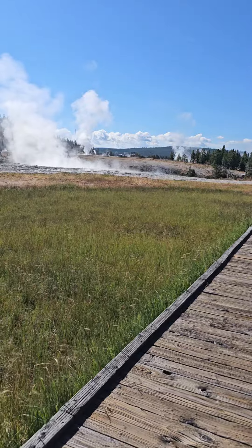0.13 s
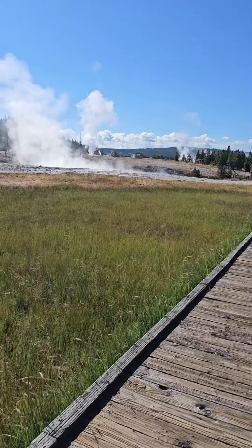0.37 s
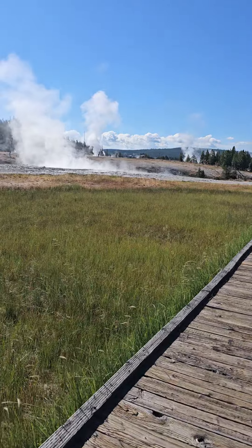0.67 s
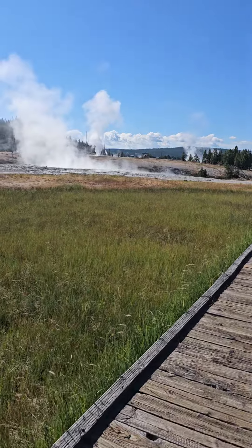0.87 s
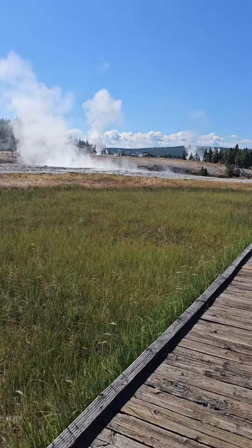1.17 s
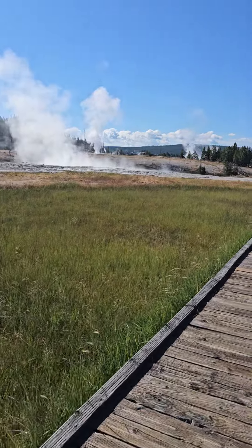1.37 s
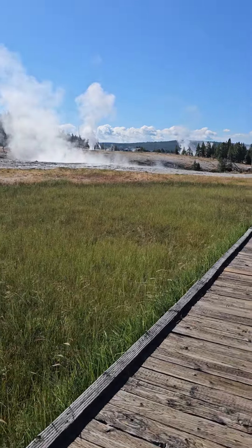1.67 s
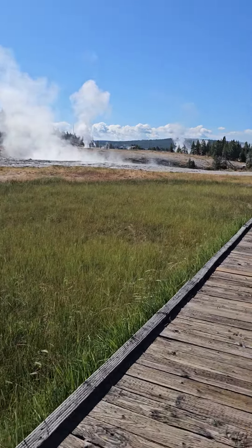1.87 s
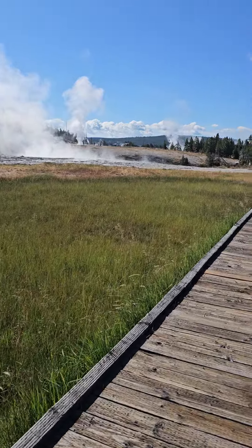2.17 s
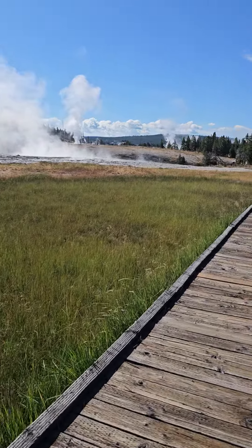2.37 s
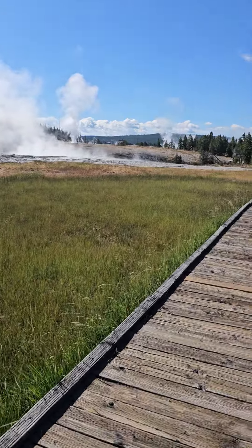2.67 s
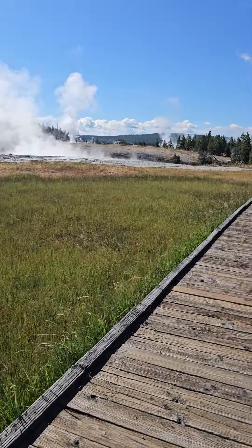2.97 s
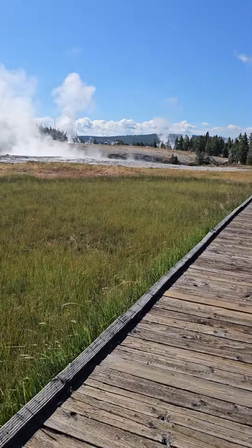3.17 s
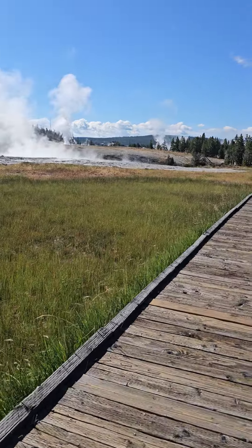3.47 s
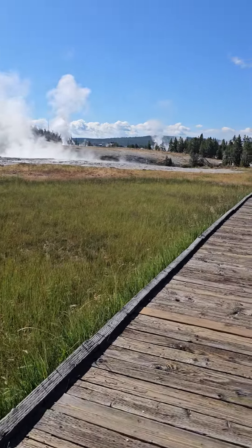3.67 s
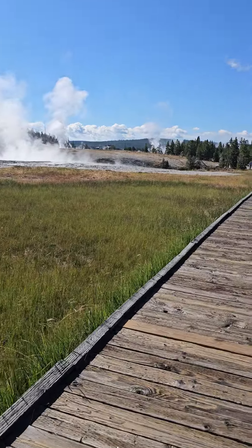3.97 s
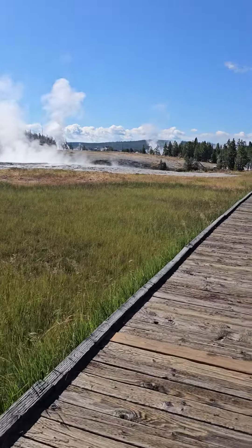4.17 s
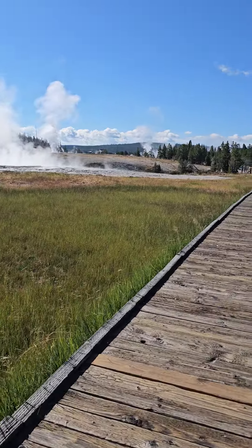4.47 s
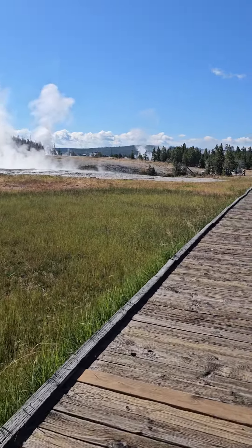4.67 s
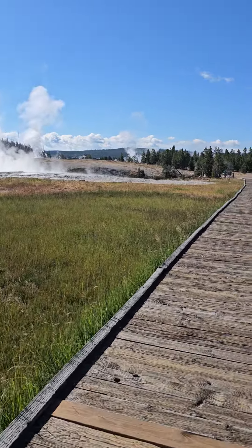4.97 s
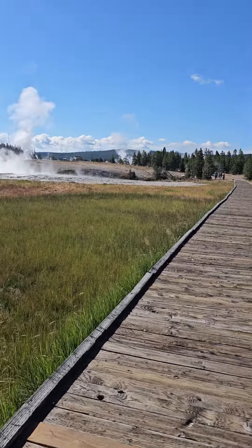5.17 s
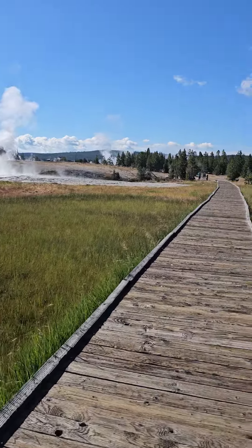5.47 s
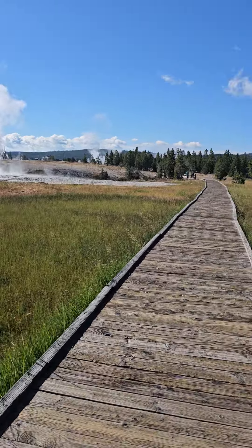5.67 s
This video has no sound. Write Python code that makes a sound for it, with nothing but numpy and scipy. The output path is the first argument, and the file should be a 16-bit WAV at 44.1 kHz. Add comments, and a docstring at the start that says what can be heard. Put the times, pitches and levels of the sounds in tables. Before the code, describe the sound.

An open outdoor place with light wind: a soft, lumpy low rumble swelling in small gusts, notably around 1.2, 3 and 5.3 seconds, plus a faint airy hiss. From the start, quick footsteps tap a wooden boardwalk about every 0.27 seconds, quiet and dull, with small bounces between. At about 2.8 seconds they become much louder and closer, each a short hollow plank knock around a low-mid pitch, with a noisy sole crack and brief deck rumble. A faint metal clink comes near 2.9. Steps continue evenly to the end; those near 4.9, 5.15 and 5.45 crack more sharply. Hard clicks stand out at 4.75, 5.35, 5.43, 5.6 and 5.8, with a small ringing clink at 4.75 and a shorter one at 5.6. Gritty scuffs brush between late steps. Hand-held stereo microphone, dry, brighter on the right.

```python
"""Quick steps grow louder as they come closer along a wooden boardwalk, over light wind and faint outdoor hiss.
Each step knocks a plank: damped modes of the wood, a noisy sole crack and the rumble of the deck.
Soles scuff as shaped noise, small hard things click as short noise bursts, and a bit of metal clinks
now and then as dying modes. Wind and hiss are noise with drifting spectra.
A hand-held pair of microphones hears it all; the body shades the left port's treble from the walkway."""
import sys
import numpy as np
from scipy import signal
from scipy.fft import rfft, irfft, next_fast_len
from scipy.io import wavfile
from scipy.ndimage import uniform_filter1d

SR = 44100
rng = np.random.default_rng(int(sys.argv[2]) if len(sys.argv) > 2 else 0)


def generate_wav(sig):
    """Save sig (samples, or channels by samples) to the path in sys.argv[1] as 16-bit PCM at SR."""
    pcm = np.round(np.clip(np.atleast_2d(sig).T, -1, 1) * 32767).astype(np.int16)
    wavfile.write(sys.argv[1], SR, pcm)


N = 256653

# Spectrum of the outdoor hiss, which also colours the scuffs: hz, level_db (relative, per Hz)
AIR_SPECTRUM = [(88, -37.5), (150, -13.5), (264, -13), (348, -31), (662, -30.5), (960, -24.5),
                (1400, -28.5), (1850, -27.5), (2200, -22.5), (2600, -32.5), (3160, -31), (4240, -28),
                (5790, -30.5), (7470, -30.5), (10400, -36.5), (14800, -33.5), (16000, -56)]


def amp(db):
    """Level law: decibels to amplitude gain."""
    return np.exp(np.asarray(db) * (np.log(10) / 20))


def read(points, hz):
    """Logarithmic frequency scale: interpolates a spectrum table along it."""
    table_hz, value = np.transpose(points)
    return np.interp(np.log(hz + 1), np.log(table_hz + 1), value)


def octaves(hz, reference_hz):
    """Pitch interval: octaves of a frequency above a reference, safe at 0 Hz."""
    return np.log2((hz + 1) / reference_hz)


def octaves_below(hz, corner_hz):
    """High-pass slope: octaves by which a frequency lies below a corner, else 0."""
    return np.maximum(np.log2(corner_hz / (hz + 1)), 0)


def peaked(x):
    """Peak normalisation: scales the largest excursion to 1."""
    return x / (np.abs(x).max() + 1e-12)


def ring(hz, db, t60, t, phase=0):
    """Modal superposition: a sum of sines, each falling 60 dB in its t60."""
    hz, db, t60, phase = (np.reshape(v, (-1, 1)) for v in (hz, db, t60, phase))
    envelope = amp(db - 60 * t / t60)
    partials = envelope * np.sin(2 * np.pi * hz * t + phase)
    return (partials * (hz < SR / 2)).sum(0)


def colour(x, db_at):
    """Linear filtering: multiplies the spectrum by a gain in dB given as a function of frequency."""
    size = next_fast_len(len(x))
    gain = amp(db_at(np.fft.rfftfreq(size, 1 / SR)))
    return irfft(rfft(x, size) * gain, size)[:len(x)]


def add(mix, s, sound, pan_db=0):
    """Interaural-style cues: a time lag at the left port and a left-minus-right level difference."""
    lag_s = .00046  # the left port hears the walkway later
    for channel, (delay, db) in enumerate([(lag_s / 2, pan_db / 2), (-lag_s / 2, -pan_db / 2)]):
        start = max(round((s + delay) * SR), 0)
        part = mix[channel, start:][:len(sound)]
        part += amp(db) * sound[:len(part)]


def hiss(points, patchy_db, swell_db, size):
    """Partly coherent random noise at two ports, with drifting patches and a shared flicker, rms 1."""
    # Left-right likeness of the noise: hz, coherence (0 to 1)
    likeness = [(20, 0.61), (150, 0.98), (600, 0.14), (2000, 0.043), (16000, 0.18)]
    frames, hz = 4 * N // size + 6, np.fft.rfftfreq(size, 1 / SR)
    a, b, c, d, patch = rng.standard_normal((frames, len(hz), 5)).T
    patch = uniform_filter1d(uniform_filter1d(patch, size=12, axis=0), size=10, axis=1)
    swell = uniform_filter1d(rng.standard_normal(frames), size=8)
    same = np.clip(read(likeness, hz), -1, 1)[:, None]
    left = a + 1j * b
    right = same * left + np.sqrt(1 - same ** 2) * (c + 1j * d)
    level_db = read(points, hz)[:, None] + patchy_db * patch / patch.std() + swell_db * swell / swell.std()
    spectra = np.array([left, right]) * amp(level_db)
    out = signal.istft(spectra, nperseg=size, noverlap=3 * size // 4)[1][:, :N]
    return out / out.std()


def wind():
    """Turbulence noise: a lumpy low rumble whose level follows the gusts."""
    # Gusts: time_s, rms_db
    gusts = [(0.0, -41), (0.13, -47), (0.26, -43.5), (0.68, -48.5), (1.0, -48), (1.2, -37.5), (1.45, -40.5),
             (2.28, -47.5), (2.5, -43.5), (2.77, -45), (2.95, -37.5), (3.13, -50), (3.5, -40.5),
             (4.05, -42.5), (4.4, -45.5), (4.9, -48.5), (5.33, -33.5), (5.55, -45), (5.82, -37.5)]
    # Rumble spectrum: hz, level_db (relative, per Hz)
    rumble_spectrum = [(15, -11), (35, 7.5), (70, -2), (140, -12.5), (300, -22), (700, -25.5), (1500, -100)]
    s, db = np.transpose(gusts)
    rumble = hiss(rumble_spectrum, patchy_db=4.0, swell_db=0.5, size=2048)
    return amp(np.interp(np.arange(N) / SR, s, db)) * rumble


def air():
    """Broadband background noise split into two bands: a steady low part and a treble that rises and falls."""
    # Treble of the hiss: time_s, rms_db
    treble_levels = [(0.0, -63.5), (0.08, -63.5), (0.81, -69), (1.22, -55.5), (1.34, -61), (1.72, -63.5),
                     (2.12, -69), (2.59, -65), (3.1, -69.5), (3.66, -64.5), (3.81, -60.5), (3.97, -61.5),
                     (4.25, -70), (4.67, -63.5), (4.8, -74), (5.17, -64.5), (5.4, -58.5), (5.82, -69)]
    treble_hz, low_gain_db = 3500, -57
    s, db = np.transpose(treble_levels)
    both = hiss(AIR_SPECTRUM, patchy_db=1.8, swell_db=.7, size=1024)
    high = np.array([colour(x, lambda f: -30 * octaves_below(f, treble_hz)) for x in both])
    treble_gain = amp(np.interp(np.arange(N) / SR, s, db))
    return amp(low_gain_db) * (both - high) + treble_gain * high / high.std()


def deck(t):
    """Dense modal field of joists and farther planks: each random partial dies at the speed of its region."""
    # Deck spectrum: hz, level_db (relative, per Hz)
    deck_spectrum = [(25, -41), (60, 3), (110, 1), (220, -6), (400, -16), (800, -9), (1600, -20.5),
                     (4000, -47)]
    # Deck decay: hz, t60_s
    deck_decay = [(50, 0.12), (200, 0.29), (600, 0.093), (2000, 0.02)]
    hz = np.exp(rng.uniform(np.log(30), np.log(3000), size=70))
    # partials spread evenly per octave thin out per Hz as 1/f, so each gains 10 log f
    level_db = read(deck_spectrum, hz) + 10 * np.log10(hz)
    return peaked(ring(hz, level_db, read(deck_decay, hz), t, rng.uniform(0, 2 * np.pi, len(hz))))


def steps():
    """Impact excitation of plank modes: the foot loads the wood gradually, the sole cracks, the deck rumbles on."""
    # Heel blows, with toe landings and bounces between:
    # time_s, knock_db, plank_pitch_hz, crack_db (over the knock), damping (factor on the low modes)
    step_table = [(0.065, -35, 96, -1.5, 0.79), (0.359, -37, 226, -40, 0.53),
                  (0.508, -26.5, 209, -10.5, 0.93), (0.522, -20, 211, -8.5, 1.9),
                  (0.595, -28, 228, -7.5, 0.48), (0.62, -36.5, 306, -10, 1.3), (0.887, -25, 273, -10, 0.79),
                  (1.14, -38.5, 155, 4, 1.5), (1.188, -28, 165.5, -5, 2.2), (1.422, -28.5, 192, -21, 0.74),
                  (1.707, -24, 223, -15, 1.36), (1.888, -33, 123.4, -2, 1), (1.955, -23.5, 277, -13, 0.34),
                  (2.007, -28.5, 220.5, -2.5, 0.8), (2.247, -27.5, 278.4, -13, 0.65),
                  (2.504, -23.5, 142, -16, 1.75), (2.558, -31.5, 200, -28, 0.97),
                  (2.637, -26, 106.6, -16, 1.5), (2.678, -39.5, 137, -9, 2.5),
                  (2.722, -33, 107, -4.5, 0.78), (2.793, -13, 199, -11.5, 1.4),
                  (2.849, -31, 220, -33, 0.92), (3.029, -29, 237, -6, 1.1),
                  (3.045, -8.5, 215.3, -15.5, 1.65), (3.279, -19.5, 202.5, -10, 0.62),
                  (3.348, -25, 108, -12, 1.6), (3.434, -25, 106, -36, 0.53), (3.544, -24, 329, -17, 0.76),
                  (3.551, -12.5, 198.5, -41, 0.66), (3.827, -13.5, 222.3, -13.5, 0.86),
                  (4.09, -14.5, 173.4, -14, 0.58), (4.355, -13, 150.5, -13, 0.52),
                  (4.614, -21, 190, -4.5, 0.22), (4.632, -18.5, 154.6, -28, 0.48),
                  (4.729, -27, 138, -15, 1.46), (4.891, -13.5, 266.4, 4, 0.55),
                  (4.922, -21.5, 94.2, -35, 0.55), (5.155, -9.5, 273.7, 0.5, 0.98),
                  (5.44, -11, 237.7, -9.5, 0.34), (5.453, -11, 266.7, 12, 0.54),
                  (5.474, -15.5, 181, -43, 2.6), (5.726, -18.5, 219.4, -25, 1.4),
                  (5.733, -13, 264, -10, 0.59)]
    # Plank modes: factor (on the plank's pitch), level_db, t60_s
    plank_modes = [(0.553, -14.5, 0.14), (0.752, -5.5, 0.06), (1.013, 0, 0.057), (1.299, -4.5, 0.033),
                   (1.7, -5.5, 0.031), (2.102, -10, 0.034), (2.602, -15, 0.04), (3.3, -23.5, 0.084),
                   (4.3, -13, 0.015)]
    # Sole crack spectrum: hz, level_db (relative, per Hz)
    crack_spectrum = [(300, -44), (550, 5), (800, 4.5), (1100, 14), (1350, 5.5), (1650, -0.5),
                      (2200, -10.5), (2900, -7), (4300, -10), (6500, -21), (10000, -32.5), (16000, -46)]
    rise_s, deck_db = .004, -5  # time constant of the load; deck rumble relative to the plank modes
    sole_tilt_db = -0.03  # sole hardness, per octave
    grit_db = 2  # the sole meets the grain unevenly, so the crack stutters
    out, t = np.zeros((2, N)), np.arange(SR // 4) / SR
    factor, mode_db, t60 = np.transpose(plank_modes)
    load = (1 - np.exp(-t / rise_s)) ** 2
    fade = amp(-60 * t / 0.066) + 0.57 * amp(-60 * t / 0.025) + 0.02 * amp(-60 * t / 0.12)
    for s, db, hz, crack_db, damping in step_table:
        spread = rng.standard_normal((2, len(factor)))
        grit, bumps = rng.standard_normal((2, len(t)))
        held = np.where(factor < 1.5, damping, 1)  # the foot's weight damps the low modes
        mode_hz = hz * factor * (1 + 0.058 * spread[0])
        modes = ring(mode_hz, mode_db, t60 / held, t, 0.74 * spread[1])
        knock = peaked(load * modes) + amp(deck_db) * np.tanh(t / 0.0079) * deck(t)
        crack = colour(grit, lambda f: read(crack_spectrum, f) + sole_tilt_db * np.log2((f + 100) / 1200))
        stutter = amp(grit_db * uniform_filter1d(bumps, size=100) * 10)  # 10 restores rms 1 after smoothing
        crack = peaked(crack * fade * stutter * np.tanh(t / 0.0011))
        start_s = s - .003
        add(out, start_s, amp(db) * knock, pan_db=2.2)
        add(out, start_s + 0.62 * rise_s, amp(db + crack_db) * crack, pan_db=1)
    return out


def scuffs():
    """Friction noise: soles drag over the wood as grainy noise that swells and fades."""
    # Drags: middle_s, half_length_s, rms_db (before the swell)
    scuff_table = [(0.524, 0.089, -82), (2.169, 0.11, -57), (4.23, 0.021, -58), (4.751, 0.032, -46.5),
                   (4.934, 0.04, -47.5), (5.307, 0.073, -53), (5.394, 0.048, -50.5), (5.436, 0.044, -55),
                   (5.556, 0.047, -53), (5.741, 0.042, -47)]
    tilt_db, grain_db = -4, 2.7  # per octave; rms of the level's roughness
    out = np.zeros((2, N))
    for s, half_length, db in scuff_table:
        grit, bumps = rng.standard_normal((2, SR // 4))[:, :round(half_length * 2 * SR)]
        grain = amp(grain_db * uniform_filter1d(bumps, size=30) * np.sqrt(30))
        rub = colour(grit * grain, lambda f: (
            read(AIR_SPECTRUM, f) + tilt_db * octaves(f, 3000) - 40 * octaves_below(f, 900)))
        swell = np.hanning(len(rub))
        add(out, s - half_length, amp(db) * rub / rub.std() * swell, pan_db=-1.5)
    return out


def clicks():
    """Impulsive contact: short hard ticks, a noise burst around one pitch with a brighter top."""
    # Ticks: start_s, body_peak_db, main_pitch_hz, top_db (over the body)
    click_table = [(0.51, -40, 5000, -4), (0.588, -40, 3120, -18), (0.825, -64, 2060, 15.5),
                   (1.5343, -34, 3100, -14), (1.8941, -33.5, 1850, 5), (2.0103, -37.5, 1960, -33),
                   (2.9185, -36.5, 3700, -23), (3.2824, -59, 4230, -19), (3.3518, -50.5, 1900, 13.5),
                   (3.5456, -40, 1900, -8), (3.7252, -49, 3580, -1), (3.9436, -38.5, 1760, -2),
                   (4.149, -38, 2840, -8), (4.164, -44, 4110, -2), (4.2193, -38.5, 2270, -30),
                   (4.2943, -33, 2930, -42), (4.3833, -39.5, 2160, -5), (4.5038, -41.5, 2140, -26),
                   (4.7503, -14, 3760, -13), (5.001, -36.5, 2360, -28), (5.2952, -37.5, 3180, -4),
                   (5.348, -8.5, 4200, -41), (5.3708, -42, 2470, -2), (5.394, -38, 2510, -16),
                   (5.4272, -16.5, 3100, -9), (5.5513, -37.5, 2520, -21), (5.6021, -39, 2175, 2.5),
                   (5.6178, -21, 2580, -29), (5.7257, -28.5, 2330, -3.5), (5.7494, -33, 4170, -37),
                   (5.8134, -15.5, 4000, -32)]
    out, t = np.zeros((2, N)), np.arange(SR // 10) / SR
    decay = amp(-60 * t / 0.0013) + 0.16 * amp(-60 * t / 0.037) + 0.0088 * amp(-60 * t / 0.2)
    shape = np.tanh(t / 0.00014) * decay
    # a patter of five faint ticks at random moments from 4.55 to 4.74 s
    faint = [(np.interp(when, (0, 1), (4.55, 4.74)), -47.5 + 4 * size, 1900 + 900 * pitch, -0.5)
             for when, size, pitch in rng.random((5, 3))]
    for s, db, hz, top_db in list(click_table) + faint:
        a, b = rng.standard_normal((2, len(t)))
        body = colour(a, lambda f: -18 * np.maximum(abs(octaves(f, hz)) - .3, 0))
        top = colour(b, lambda f: -14 * abs(octaves(f, 7500)))
        tick = peaked(body * shape) + amp(top_db) * peaked(top * shape)
        add(out, s, amp(db) * tick, pan_db=-4.5)
    return out


def clinks():
    """Beating mode pairs: small metal parts ring until the next touch damps them; close twins make them waver."""
    # Clinks: start_s, gain_db, best_woken_hz, fall_off_db (per octave away from it), damped_after_s
    clink_table = [(2.919, -56.5, 4900, 5, 0.1), (2.925, -42, 2640, 55, 0.16),
                   (3.284, -61, 3600, 2.5, 0.13), (3.73, -52, 2480, 4.5, 0.075),
                   (4.217, -58.5, 2070, 8, 0.028), (4.722, -56, 1740, 31, 0.01),
                   (4.751, -36.5, 3640, 6.5, 0.256), (4.777, -43, 5250, 27, 0.11),
                   (4.895, -45, 4800, 24, 0.34), (5.03, -58, 1800, 25, 0.1), (5.621, -25, 2870, 210, .09)]
    # Metal mode strengths, in the order of metal_hz: level_db, t60_s
    metal_modes = [(2, 0.36), (12, 0.041), (-14.5, 0.75), (-24, 0.81), (-9, 0.88), (-8, 0.45), (9, 0.099),
                   (-5, 0.19), (14, 0.019), (-9, 1), (-29, 0.2), (-1.5, 0.33), (-21.5, 0.18), (-5, 0.14),
                   (-12, 0.83), (-51, .25), (11.5, 0.11), (-8, .08), (-1.5, 0.33), (2, 0.29), (-20, 0.26),
                   (-2, 0.29), (-6.5, 0.31), (10, 0.1), (5, 0.092), (0, 0.18), (-8, 0.07), (-18, 0.055),
                   (12, 0.096), (-16, 0.045)]
    # Metal mode pitches: pitch_hz
    metal_hz = [1739, 2250, 2530, 2880, 3133, 3456, 3628, 4118, 4426, 4755, 4910, 5255, 6125, 6422, 6643,
                6750, 7405, 7779, 8120, 8610, 9600, 10022, 10480, 11450, 11632, 12250, 12990, 13730, 14550,
                15250]
    splash_db, splash_t60_s = 5.5, 0.051  # countless short modes splash at each clink
    out, t, hz = np.zeros((2, N)), np.arange(SR // 3) / SR, np.array(metal_hz)
    mode_db, t60 = np.transpose(metal_modes)
    for s, db, woken_hz, fall_db, length in clink_table:
        spread, phase = rng.standard_normal((2, len(hz))), rng.uniform(0, 2 * np.pi, (2, len(hz)))
        level_db = mode_db + 2 * spread[0] - fall_db * abs(np.log2(hz / woken_hz))
        twin_hz = hz * (1 + .002 * spread[1])
        modes = ring(hz, level_db, t60, t, phase[0])
        twins = ring(twin_hz, level_db - 2.5, 0.8 * t60, t, phase[1])
        splash = colour(rng.standard_normal(len(t)), lambda f: (
            -fall_db * abs(octaves(f, woken_hz)) - 20 * octaves_below(f, 7000)))
        sound = modes + twins + amp(splash_db - 60 * t / splash_t60_s) * splash
        damped = amp(-60 * np.maximum(t - length, 0) / 0.095)
        add(out, s, amp(db) * sound * damped * np.tanh(t / 0.0004), pan_db=-1.5)
    return out


def scene():
    """Superposition at the two ports; the hand-held body shades the left port's treble from the walkway."""
    shade_hz, shade_db = 2800, -9
    left, right = steps() + clicks() + clinks() + scuffs()
    left = colour(left, lambda f: shade_db / (1 + (shade_hz / (f + 1)) ** 4))
    return np.array([left, right]) + wind() + air()


def record(dry):
    """Soft saturation and band limiting: the input stage rounds off the highest peaks, then a low-pass."""
    edge_hz = 16100
    soft = .95 * np.tanh(dry / .95)
    low_pass = signal.firwin(511, edge_hz, window=("kaiser", 9), fs=SR)
    return signal.oaconvolve(soft, low_pass[None], "same", axes=1)


dry = scene()
out = record(dry)
generate_wav(out)
```